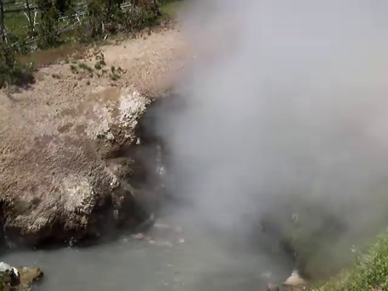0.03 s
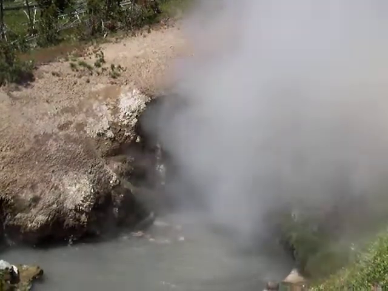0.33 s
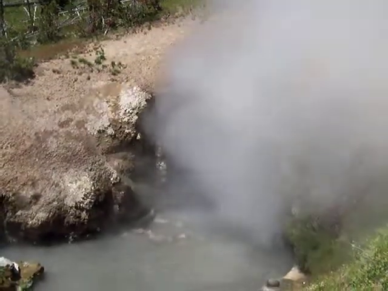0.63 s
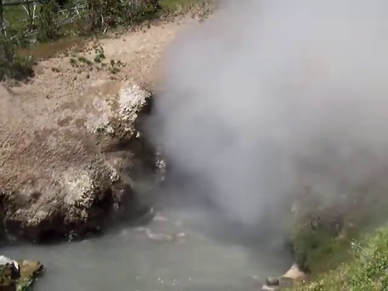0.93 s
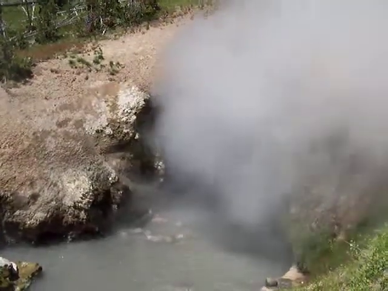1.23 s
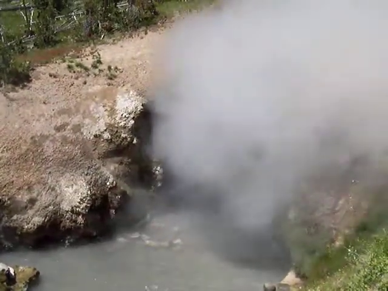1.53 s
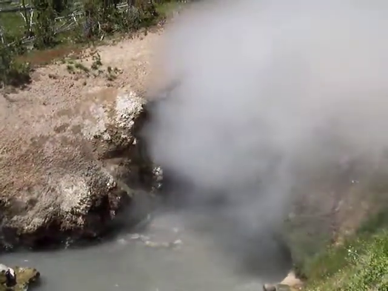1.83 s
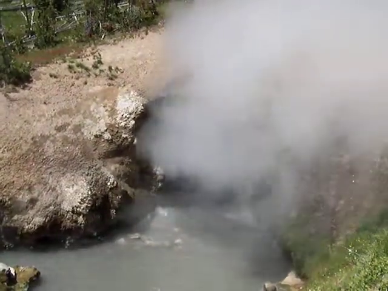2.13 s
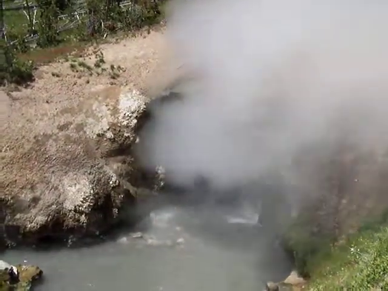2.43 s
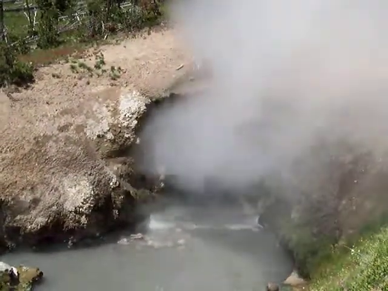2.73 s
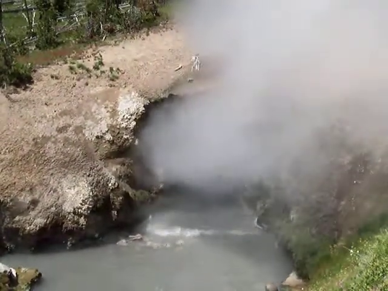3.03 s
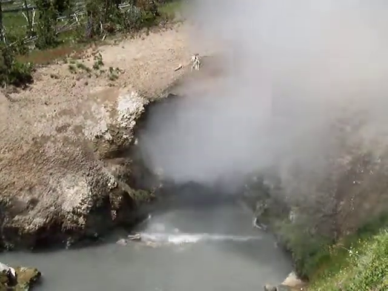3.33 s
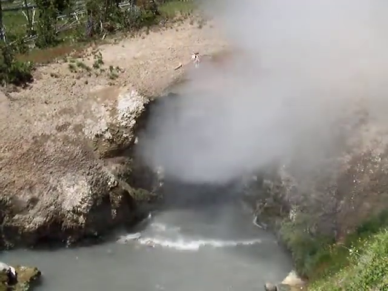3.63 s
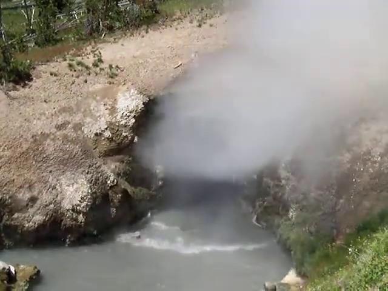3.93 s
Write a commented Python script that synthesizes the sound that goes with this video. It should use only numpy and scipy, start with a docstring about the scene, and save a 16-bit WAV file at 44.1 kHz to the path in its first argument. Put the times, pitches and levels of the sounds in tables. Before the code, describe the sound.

A hot spring rumbles, gurgles and sloshes inside a rock cave under hissing steam.

```python
"""A low rumble under hissing spray: a hot spring surging inside a rock cavern. Steam bursts through the
pool and thumps, big bubbles gulp, and waves slosh on the walls, flinging up water that lands in short
showers. Single sharp splashes fall near the mouth; they, the showers and the largest bubbles echo dully.
Heard from outside on a small stereo camera microphone with ringing ports and a limiter."""
import sys
import numpy as np
from scipy import signal
from scipy.fft import rfft, irfft, next_fast_len
from scipy.io import wavfile
from scipy.ndimage import minimum_filter1d

SR = 44100
rng = np.random.default_rng(int(sys.argv[2]) if len(sys.argv) > 2 else 0)


def bounce(signal):
    """Save signal as a 16-bit WAV file at the path given by the first command-line argument."""
    frames = np.transpose(np.atleast_2d(signal))
    limited = np.clip(frames, -1, 1)
    pcm = np.round(limited * 32767).astype(np.int16)
    wavfile.write(sys.argv[1], SR, pcm)


N = 4 * SR

# How the water leans across the microphone pair. Each row: frequency in Hz, left minus right in dB.
STEREO_BALANCE = [(25, 6.5), (100, 1.5), (700, 1.05), (1300, 2.4), (1900, -0.6), (2600, -4.5), (4300, -2.5),
                  (5200, -5), (6200, 2.5), (7500, -8)]


def from_db(db):
    """Decibels to gain."""
    return 10 ** (np.asarray(db) / 20)


def unit_rms(x):
    """Scale to an rms of one."""
    return x / np.sqrt(np.mean(x ** 2) + 1e-20)


def envelope(rows):
    """Rows of seconds and dB as a gain per sample."""
    return from_db(np.interp(np.arange(N) / SR, *np.transpose(rows)))


def at_hz(rows, hz):
    """Read a table on a log-frequency axis."""
    freqs, values = np.transpose(rows)
    return np.interp(np.log(hz), np.log(freqs), values)


def pan(db):
    """Left and right gains, the left louder by db."""
    return from_db(np.array([[.5], [-.5]]) * db)


def bandpass(x, lo_hz, hi_hz):
    """Keep a band, with gentle slopes."""
    return signal.sosfilt(signal.butter(2, [lo_hz, hi_hz], "band", fs=SR, output="sos"), x)


def drift(rate_hz):
    """A random wander with a spread of one, mostly slower than rate_hz."""
    step = 40  # samples between points
    pole = np.exp(-2 * np.pi * step * rate_hz / SR)
    noise = rng.standard_normal(N // step + 2002)
    slow = signal.lfilter([1], [1, -2 * pole, pole * pole], noise)[2000:]
    return np.interp(np.arange(N) / step, np.arange(len(slow)), unit_rms(slow))


def add(out, start_s, sound):
    """Mix a sound in at its start time."""
    i = int(start_s * SR)
    out[:, i:i + sound.shape[-1]] += sound[..., :N - i]


def ring_down(t, attack_s, t60):
    """A quick rise, and a decay of 60 dB in t60 seconds."""
    return (1 - np.exp(-t / attack_s)) * from_db(-60 * t / t60)


def wash(spectrum, lo_hz, hi_hz, flicker_db, flicker_hz, bands):
    """Moving water as bands of stereo noise, each flickering on its own by flicker_db."""
    # How alike the two channels are. Each row: frequency in Hz, correlation.
    likeness = [(25, 0.38), (60, 0.8), (150, 0.92), (700, 0.99), (1500, 0.81), (3200, 0.83), (5000, 0.44),
                (8000, 0.65)]
    out, edges = 0, np.geomspace(lo_hz, hi_hz, bands + 1)
    white = rng.standard_normal((2, 2, N + SR // 4))
    for k, (low, high) in enumerate(zip(edges, edges[1:])):
        mid, side = bandpass(white[k % 2], low, high)[:, -N:]
        hz = np.sqrt(low * high)
        alike = at_hz(likeness, hz)
        stereo = np.sqrt(1 + alike) * mid + np.sqrt(1 - alike) * side * [[1], [-1]]
        gain = from_db(at_hz(spectrum, hz) + flicker_db * drift(flicker_hz))
        out = out + gain * pan(at_hz(STEREO_BALANCE, hz)) * stereo
    return unit_rms(out)


def bubbles(spectrum, lo_hz, hi_hz, per_s, cycles, size_db, spread_rad, pitches):
    """A crowd of bubbles, random in time, strength and place, each dying by 60 dB over its cycles."""
    out = np.zeros((2, N))
    floor = 1e-9 * np.sin(np.arange(N))  # keeps the decays from underflowing
    for hz in np.geomspace(lo_hz, hi_hz, pitches):
        gap, size, sign, place = rng.random((2000, 4)).T
        onsets = (np.cumsum(-np.log(1 - gap)) * pitches / per_s * SR).astype(int)
        height = from_db(size_db * np.minimum(-np.log(1 - size), 4)) * np.sign(sign - .5)
        angle = np.pi / 4 + spread_rad * (2 * place - 1)
        kicks, inside = np.zeros((2, N)), onsets < N
        kicks[:, onsets[inside]] = (height * [np.cos(angle), np.sin(angle)])[:, inside]
        pole, omega = from_db(-60 * hz / (cycles * SR)), 2 * np.pi * hz / SR
        rings = signal.lfilter([1, 0, -1], [1, -2 * pole * np.cos(omega), pole * pole], kicks + floor)
        out += rings * hz * from_db(at_hz(spectrum, hz)) * pan(at_hz(STEREO_BALANCE, hz))
    return unit_rms(bandpass(out, lo_hz / 1.01, hi_hz * 0.8))


def rumble():
    """The pool heaves inside the cavern: the lowest wash of noise."""
    # The heaving. Each row: time in seconds, level in dB.
    surges = [(0.0, -17.5), (0.09, -21.5), (0.21, -16), (0.36, -23), (0.5, -17.5), (0.62, -20.5),
              (0.77, -26), (1.08, -24.5), (1.27, -17.5), (1.38, -21), (1.46, -16.5), (1.65, -19),
              (1.78, -21.5), (1.9, -18), (1.98, -25), (2.06, -18), (2.13, -22), (2.42, -17), (2.53, -17),
              (2.59, -25), (2.88, -28.5), (3.02, -20), (3.13, -22), (3.25, -17), (3.55, -13.5),
              (3.66, -13.5), (3.78, -20.5), (3.93, -15.5), (4.0, -21)]
    # Its colour. Each row: frequency in Hz, relative level in dB.
    spectrum = [(11, -32), (18, 0.5), (65, 1.5), (130, -10.5), (170, -40), (290, -120)]
    return envelope(surges) * wash(spectrum, 24.2, 102.6, flicker_db=1.35, flicker_hz=16, bands=6)


def gulps():
    """Crowds of big bubbles ring low on a wash of moving water."""
    # The gulping. Each row: time in seconds, level in dB.
    surges = [(0.0, -25.5), (0.33, -25.5), (0.52, -20), (0.64, -22.5), (0.78, -26.5), (1.02, -27),
              (1.17, -22.5), (1.3, -27.5), (1.48, -19), (1.73, -24), (1.88, -24.5), (1.98, -25),
              (2.08, -25), (2.16, -23), (2.42, -21.5), (2.56, -22.5), (2.78, -28.5), (3.0, -24),
              (3.1, -26.5), (3.17, -22), (3.33, -19.5), (3.5, -23), (3.63, -20.5), (3.8, -23), (3.95, -17),
              (4.0, -23)]
    # Its colour. Each row: frequency in Hz, relative level in dB.
    spectrum = [(59, -30), (100, 5), (146, -7), (199, -3), (318, -3), (460, -12.5), (600, -43),
                (1010, -120)]
    water = wash(spectrum, 116.2, 400, flicker_db=0, flicker_hz=6.7, bands=6)
    crowd = bubbles(spectrum, 113.4, 398.5, per_s=150, cycles=12.4, size_db=2.5, spread_rad=.19, pitches=14)
    return envelope(surges) * (from_db(-3.5) * water + from_db(-4.5) * crowd)


def slosh(spurt):
    """Waves on the rock walls: a lighter wash with smaller bubbles, swelling a little with each spurt."""
    # The waves. Each row: time in seconds, level in dB.
    surges = [(0.0, -34), (0.28, -31), (0.38, -25.5), (0.52, -25.5), (0.78, -27.0), (1.08, -28),
              (1.22, -26.5), (1.28, -28.5), (1.34, -26.5), (1.52, -25), (1.68, -32), (1.74, -33.5),
              (1.82, -27.5), (1.96, -28.5), (2.02, -29.5), (2.2, -27.5), (2.29, -24.5), (2.4, -27),
              (2.62, -27.5), (2.85, -27.5), (3.05, -25.5), (3.27, -24), (3.45, -26), (3.6, -24.5),
              (3.7, -22.5), (3.84, -22), (4.0, -22.5)]
    # Their colour. Each row: frequency in Hz, relative level in dB.
    spectrum = [(220, -31), (380, 1.5), (506, -7.5), (667, -0.5), (1120, -5.5), (1500, 1.5), (1950, -35),
                (3300, -120)]
    water = wash(spectrum, 399, 1357, flicker_db=1.44, flicker_hz=10, bands=6)
    crowd = bubbles(spectrum, 424, 1344, per_s=400, cycles=19.7, size_db=1.5, spread_rad=.25, pitches=20)
    return envelope(surges) * from_db(0.33 * spurt) * (from_db(-1.5) * water + from_db(-5) * crowd)


def spray(spurt):
    """Steam and foam hiss under a wide crackle of drops, coming in quick spurts."""
    # The spray. Each row: time in seconds, level in dB.
    surges = [(0.0, -28.5), (0.09, -26.5), (0.14, -28), (0.22, -26.5), (0.31, -26), (0.4, -22),
              (0.53, -22.5), (0.63, -22), (0.72, -21), (0.9, -22), (1.05, -21.5), (1.17, -22), (1.27, -23),
              (1.35, -21.0), (1.52, -19.5), (1.58, -22), (1.68, -24), (1.705, -27.5), (1.74, -26.5),
              (1.78, -22), (1.85, -22.5), (1.92, -25), (2.02, -23.5), (2.13, -20.2), (2.2, -21),
              (2.29, -20.5), (2.4, -21), (2.5, -22), (2.66, -22), (2.8, -21.5), (2.9, -22), (3.0, -20),
              (3.12, -18.5), (3.29, -17.5), (3.42, -20.5), (3.6, -17.5), (3.85, -16), (4.0, -18)]
    # Its colour. Each row: frequency in Hz, relative level in dB.
    spectrum = [(1200, 1), (1650, 3), (2200, 2), (2900, 4.5), (3900, 1.5), (5000, 0.5), (6200, -5.5),
                (6900, -7.5), (7600, -65), (8400, -41)]
    hiss = wash(spectrum, 1304, 8400, flicker_db=1.16, flicker_hz=37, bands=14)
    drops = bubbles(spectrum, 1477, 6460, per_s=3500, cycles=18, size_db=3.5, spread_rad=.88, pitches=26)
    return envelope(surges) * (from_db(-3 + 0.87 * spurt) * hiss + from_db(-7.5 + 1.35 * spurt) * drops)


def showers():
    """Flung droplets land together in a brief swell of hiss, a little to the right."""
    # Each row: start in seconds, level in dB, centre in Hz, swell in seconds, band edge over centre.
    landings = [(0.1, -23, 3680, 0.0047, 1.3), (0.405, -25, 4960, 0.003, 1.2),
                (0.503, -17, 2950, 0.0023, 1.4), (0.569, -17, 3800, 0.003, 1.27),
                (1.145, -20.5, 2460, 0.0023, 1.25), (2.125, -29, 5400, 0.0059, 1.08),
                (2.28, -27, 5400, 0.0076, 1.15), (2.508, -21.5, 3940, 0.0082, 1.22),
                (2.968, -19.5, 3150, 0.006, 1.2), (3.267, -16, 2900, 0.008, 1.1),
                (3.675, -18.5, 5240, 0.003, 1.1), (3.821, -17, 4700, 0.0029, 1.1),
                (3.841, -17.5, 3900, 0.0043, 1.1)]
    out, t = np.zeros((2, N)), np.arange(SR // 8) / SR
    for start, db, hz, swell_s, width in landings:
        shared, left, right = bandpass(rng.standard_normal((3, len(t))), hz / width, hz * width)
        hiss = unit_rms(shared + 0.81 * np.array([left, right]))
        swell = t / swell_s * np.exp(1 - t / swell_s)
        add(out, start, pan(-2.5) * from_db(db) * swell * hiss)
    return out


def thumps():
    """Pockets of steam burst deep in the cavern, each with a few slow swings."""
    # Each row: start in seconds, level in dB, pitch in Hz, seconds to fall 60 dB.
    bursts = [(0.129, -2.5, 61.6, 0.13), (0.496, -6, 67, 0.084), (1.694, 1, 46, 0.11),
              (1.87, -9.5, 53.3, 0.16), (2.39, -10, 55.3, 0.092), (3.46, -12, 80, 0.41)]
    out, t = np.zeros((2, N)), np.arange(SR // 3) / SR
    for start, db, hz, t60 in bursts:
        thump = ring_down(t, attack_s=0.0011, t60=t60) * np.sin(2 * np.pi * hz * t)
        add(out, start, pan(2.7) * from_db(db) * thump)
    return out


def glugs():
    """Single large bubbles ring, wobbling and rising in pitch as they surface."""
    # Each row: start in seconds, level in dB, pitch in Hz, seconds to fall 60 dB.
    large_bubbles = [(.49, -14.5, 304, .12), (.62, -19, 335, .11), (1.165, -13, 320, 0.14),
                     (1.325, -20.5, 770, 0.14), (1.469, -15, 245, 0.19), (1.895, -14.5, 179, 0.23),
                     (1.95, -17, 675, 0.1), (2.06, -11, 132, 0.21), (2.195, -19, 285, 0.13),
                     (2.275, -12, 740, .11), (2.35, -10, 361, 0.096), (2.378, -9, 222, 0.1),
                     (2.425, -17, 323, 0.16), (2.485, -16, 211, 0.15), (2.555, -11, 662, 0.064),
                     (2.603, -12, 615, 0.12), (2.612, -15.5, 538, 0.11), (2.68, -16, 653, 0.12),
                     (2.72, -16, 262, 0.15), (2.81, -19, 238, 0.14), (3.072, -10, 280, .09),
                     (3.088, -7.5, 326, 0.093), (3.2, -17, 1070, 0.1), (3.272, -18, 826, .09),
                     (3.301, -24, 332, .11), (3.385, -17, 441, 0.14)]
    out, t = np.zeros((2, N)), np.arange(SR // 4) / SR
    rise, wobble = 0.17 * t, 0.035 * drift(rate_hz=45)  # shares of the pitch
    for start, db, hz, t60 in large_bubbles:
        pitch = hz * (1 + rise + wobble[int(start * SR):][:len(t)])
        glug = ring_down(t, attack_s=0.0046, t60=t60) * np.sin(2 * np.pi * np.cumsum(pitch) / SR)
        add(out, start, pan(1.3) * from_db(db) * glug)
    return out


def splashes():
    """A drop slaps the pool near the mouth: a rough ping swelling as its cavity opens, and a spatter."""
    # Each row: start in seconds, level in dB, pitch in Hz, left minus right in dB.
    slaps = [(0.555, -5.5, 3950, -8), (0.766, -5.5, 6570, 8.5), (.877, -7, 2420, -7),
             (0.956, -4, 6450, 3.5), (1.0054, 2.5, 5860, 3.5), (1.2357, 3.5, 4740, -0.5),
             (1.401, -6, 5860, -7), (1.5576, 0, 5350, -7), (1.569, -5, 5750, 11.5), (1.630, -10, 5300, -12),
             (1.6768, 1, 5540, -7), (2.747, -4.5, 5060, -6), (2.782, -5.5, 5600, -1),
             (3.393, -0.5, 6330, -8), (3.527, -1.5, 5460, -9.5), (3.642, 2, 3300, -3.5)]
    ring_cycles, wander_rad, spatter_s = 23.2, 0.26, 0.0021
    out, t = np.zeros((2, N)), np.arange(SR // 20) / SR
    for start, db, hz, side_db in slaps:
        wander = wander_rad * np.cumsum(rng.standard_normal(len(t))) / np.sqrt(SR / hz)
        ping = ring_down(t, attack_s=0.00023, t60=ring_cycles / hz) * np.sin(2 * np.pi * hz * t + wander)
        spatter = from_db(-13.5) * np.exp(-t / spatter_s) * rng.standard_normal(len(t))
        add(out, start, pan(side_db) * from_db(db) * (ping + spatter))
    return bandpass(out, 1100, 6800)


def cavern(x):
    """Dull echoes circle between the rock walls along eight paths."""
    t60, wall_hz, paths = 0.43, 2500, 8
    size = next_fast_len(N + SR)
    hz, echoes = np.arange(size // 2 + 1) * SR / size, 0
    for lag_s in rng.uniform(0.014, 0.055, paths):
        round_trip = from_db(-60 * lag_s / t60) * np.exp(-2j * np.pi * hz * lag_s)
        echoes = echoes + round_trip / (1 - round_trip)
    response = echoes / np.sqrt(paths) / (1 + 1j * hz / wall_hz)
    return irfft(rfft(x, size) * response, size)[:, :N]


def scene():
    """The spring from outside the mouth: churning water, with glugs, splashes and showers echoing."""
    spurt = drift(rate_hz=30)  # quick swells shared by slosh and spray
    singles = glugs() + splashes() + showers()
    pool = rumble() + thumps() + gulps() + slosh(spurt) + spray(spurt)
    return pool + singles + from_db(-11) * cavern(singles)


def port(x, resonances):
    """One microphone port rings, lifting a narrow band at each resonance."""
    for hz, q, boost_db in resonances:
        omega, lift = 2 * np.pi * hz / SR, from_db(boost_db / 2)
        width, tuning = np.sin(omega) / (2 * q), -2 * np.cos(omega)
        zeros = [1 + width * lift, tuning, 1 - width * lift]
        poles = [1 + width / lift, tuning, 1 - width / lift]
        x = signal.lfilter(zeros, poles, x)
    return x


def limiter(x):
    """Peaks push the gain down; it holds, then recovers at a steady rate."""
    threshold_db, attack_s, hold_s, release_db_per_s = 4, 0.00025, 0.043, 97
    over_db = np.maximum(20 * np.log10(np.abs(x).max(axis=0) + 1e-9) - threshold_db, 0)
    hold = int(hold_s * SR)
    held_db = -minimum_filter1d(-over_db, hold, origin=(hold - 1) // 2)
    ramp = release_db_per_s * np.arange(N) / SR
    cut_db = np.maximum.accumulate(held_db + ramp) - ramp
    pole = np.exp(-1 / (attack_s * SR))
    return x * from_db(-signal.lfilter([1 - pole], [1, -pole], cut_db))


def record(dry):
    """The camera microphone: ringing ports, a limiter, overload on the sharpest splashes, no top treble."""
    # The resonances of each port. Each row: frequency in Hz, Q, boost in dB.
    left_port = [(5990, 4.3, 13.5), (5400, 7.7, 2.5)]
    right_port = [(5060, 2.52, 7.4), (5125, 19, 5.75)]
    ringing = np.array([port(dry[0], left_port), port(dry[1], right_port)])
    dulled = signal.sosfilt(signal.butter(4, 7400, fs=SR, output="sos"), ringing)
    clipped = np.clip(limiter(dulled), -1, 1)
    return signal.sosfilt(signal.ellip(10, .2, 90, 8400, fs=SR, output="sos"), clipped)


dry = scene()
out = record(dry)
bounce(out)
```